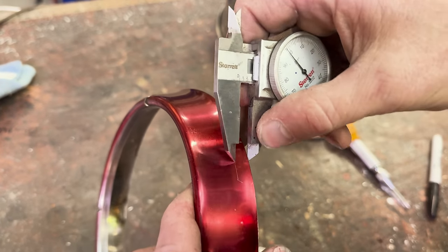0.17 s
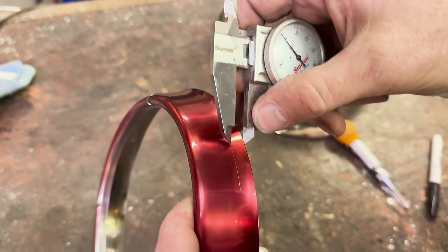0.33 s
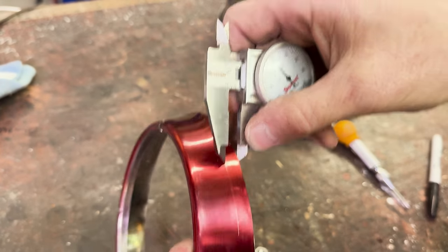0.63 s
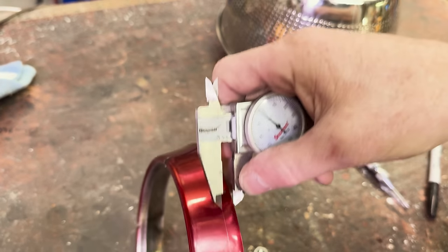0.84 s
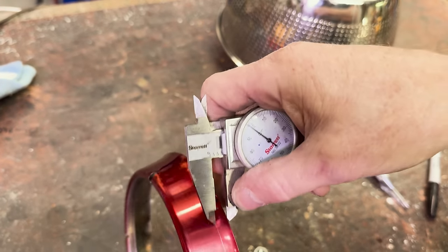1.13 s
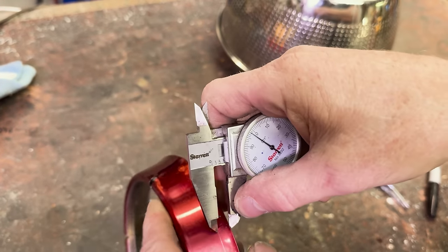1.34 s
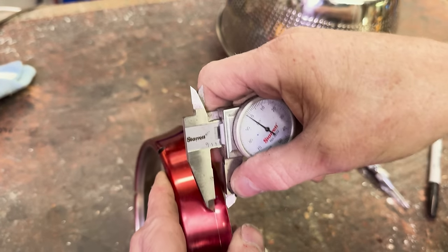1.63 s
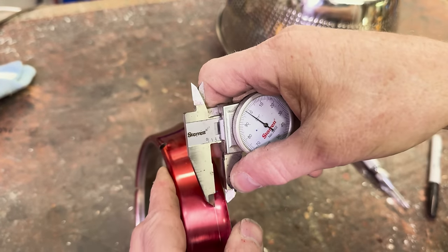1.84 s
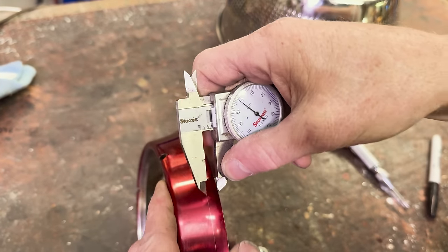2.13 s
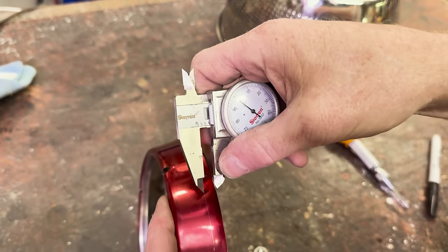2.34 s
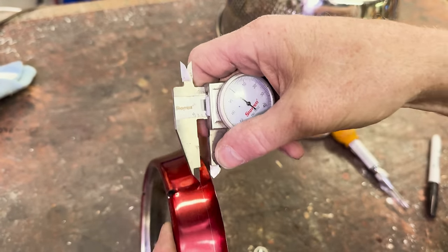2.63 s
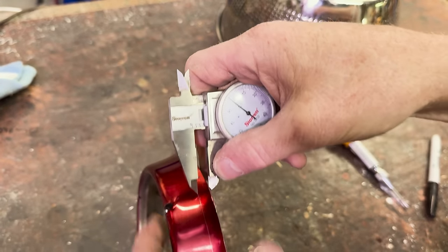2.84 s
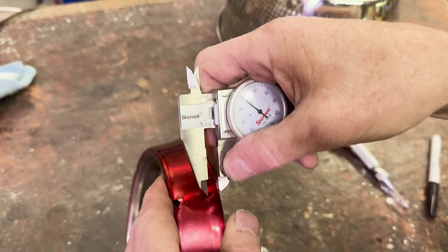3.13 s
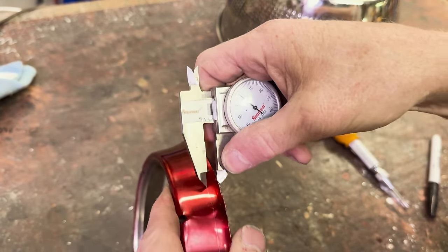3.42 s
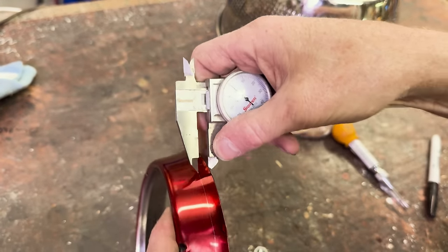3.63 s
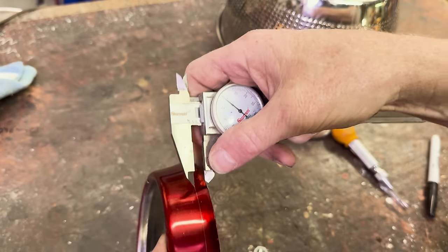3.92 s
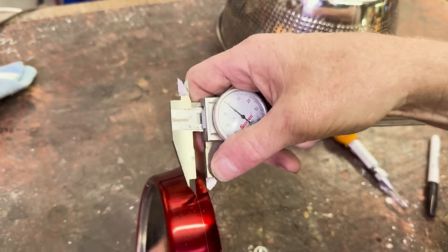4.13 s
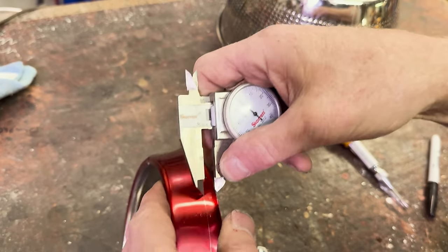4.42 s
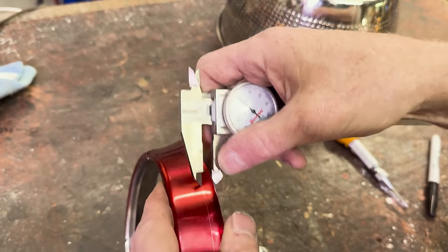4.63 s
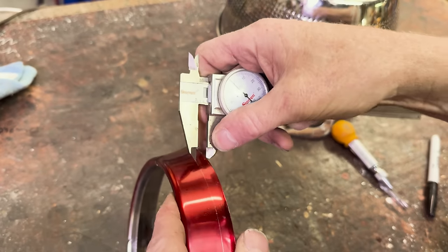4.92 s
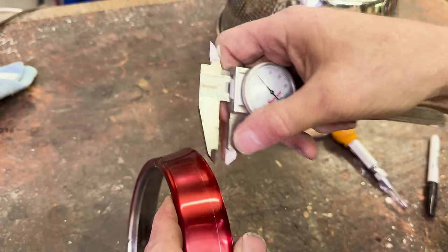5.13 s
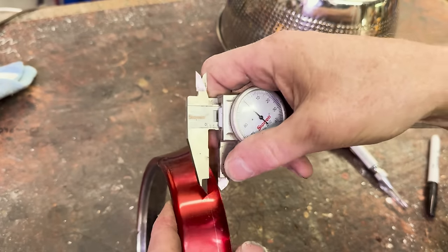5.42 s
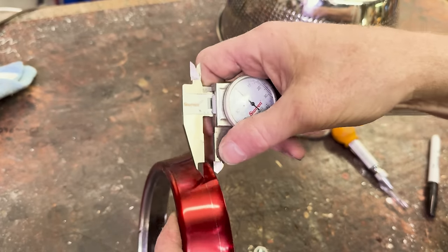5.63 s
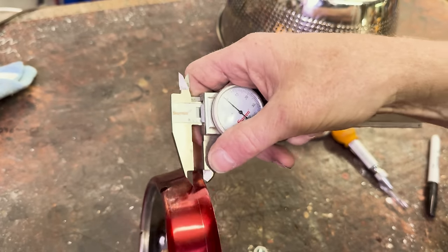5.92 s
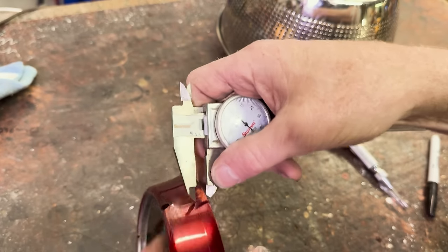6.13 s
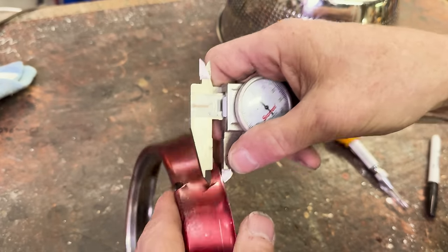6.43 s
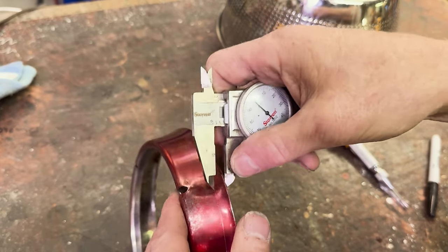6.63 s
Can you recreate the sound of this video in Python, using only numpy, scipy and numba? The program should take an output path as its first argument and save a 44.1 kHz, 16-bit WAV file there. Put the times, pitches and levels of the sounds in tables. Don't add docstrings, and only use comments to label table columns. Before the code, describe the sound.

Short uneven scratches of steel on steel, raspy and ringing in the mids with a thin bright hiss on top. They come in clusters separated by light skims, dull drags, small ticks and soft skin brushes as the ring is turned. Occasional hard clinks stand out, strongest in the later half. Close phone microphone, small dry workshop echo, distant low machine drone and quiet air underneath.

```python
import sys
import numpy as np
from scipy import signal
from scipy.io import wavfile
from scipy.ndimage import uniform_filter1d
from numba import njit

SR = 44100
rng = np.random.default_rng(int(sys.argv[2]) if len(sys.argv) > 2 else 0)


def how_loud(loudness_db):
    steps = np.asarray(loudness_db, float) / 20
    return 10 ** steps


def master(y):
    cut = np.clip(np.atleast_2d(y).T, -1, 1)
    pcm = np.round(cut * 32767)
    wavfile.write(sys.argv[1], SR, pcm.astype(np.int16))


N = 298557

# pitch_hz, width_hz, level_db
WALL_MODES = [(330, 170, -11.5), (520, 50, -8), (856, 130, -0.5), (1037, 206, -1), (1320, 28, -6.5),
              (1810, 240, -2.5), (2527, 190, -5.5), (1280, 5400, -17)]
# pitch_hz, width_hz, level_db
RIM_MODES = [(3024, 1400, -4.5), (3650, 67, -2), (4116, 170, 2), (4466, 160, 0), (4710, 100, -7.5),
             (4860, 440, -12), (5620, 89, -8.5), (6300, 200, -6.5), (4300, 6600, -11.5)]
# pitch_hz, width_hz, level_db
JAW_MODES = [(7100, 52, -3), (7332, 28, 3), (7550, 230, -6), (7816, 150, -1.5), (8075, 48, -3),
             (8550, 320, -5), (9270, 140, -2.5), (9600, 120, -13.5), (10300, 190, -11.5),
             (10180, 260, -8.5), (9100, 4800, -11.5)]
# pitch_hz, width_hz, level_db
EDGE_MODES = [(10950, 99, 2), (11440, 270, 1.5), (12170, 340, 4.5), (12080, 250, -16.5), (13700, 360, -2),
              (14300, 160, -5.5), (14840, 300, -7.5), (12400, 4300, -15.5)]
# pitch_hz, density_db (per Hz)
SHOP_SPECTRUM = [(24, -33), (40, -3.5), (131, -2), (336, -39), (450, -21), (484, -31), (520, -23),
                 (1050, -23), (1510, -23), (2020, -28.5), (5710, -41.5), (13000, -76.5)]
# start_s, peak_db, pitch_hz
GRIP_BUMPS = [(0.004, -49, 99), (0.898, -55, 219), (0.936, -47, 169), (1.038, -50, 175),
              (3.924, -51.5, 210), (4.61, -50, 176), (4.629, -48, 97), (5.374, -54.5, 280),
              (5.386, -46.5, 122), (5.8, -51, 120), (6.646, -55.5, 201)]
# start_s, length_s, first_force_db, last_force_db, wall_bite_db
STROKES = [(0.0, 0.0094, -44.5, -63.5, 1), (.05, .008, -60, -70, -1), (0.096, 0.03, -45, -37.5, 2),
           (0.234, 0.08, -33.5, -36.5, 0), (0.342, 0.067, -34, -33, -1), (0.421, 0.051, -43, -51.5, 4),
           (0.522, 0.029, -42.5, -40, 3.5), (1.944, 0.047, -48, -43.5, 11.5), (2.005, 0.06, -47, -47, 2),
           (2.088, 0.049, -43, -50.5, 5), (2.154, 0.12, -52, -51, 4.5), (2.292, 0.096, -50.5, -46.5, 3),
           (2.397, 0.1, -55, -61.5, 6), (2.509, 0.063, -32.5, -37.5, -6.5), (3.31, 0.054, -41, -31.5, 1),
           (3.465, 0.12, -50.5, -26.5, 4.5), (3.602, 0.036, -22.5, -36.5, 0), (3.887, 0.03, -52.5, -34, -3),
           (4.632, 0.072, -36, -29.5, -4), (4.725, 0.085, -30.5, -41, -1.5),
           (4.944, .03, -55.5, -55.5, 4.5), (5.512, 0.06, -30.5, -29, 1.5), (5.759, 0.087, -33, -40, 1),
           (5.86, 0.054, -49, -52.5, 0)]
# start_s, length_s, first_force_db, last_force_db
SKIMS = [(.8, 0.096, -68, -78), (1.06, 0.11, -58.5, -59.5), (1.24, .05, -59, -53.5), (1.3, 0.11, -59, -66),
         (1.478, 0.023, -59, -52), (2.705, 0.058, -63.5, -50.5), (2.775, 0.037, -61, -61.5),
         (2.907, 0.043, -53.5, -47), (3.26, 0.038, -64, -49), (3.82, 0.04, -53.5, -61),
         (4.048, 0.052, -50, -57.5), (4.115, .015, -53.5, -56), (4.18, 0.018, -54, -59),
         (4.243, 0.035, -47, -41.5), (4.3, 0.048, -61, -59), (4.49, 0.032, -67, -76),
         (6.028, 0.011, -48.5, -52.5), (6.07, 0.023, -61, -56), (6.138, 0.03, -44, -45),
         (6.2, 0.05, -50.5, -49.5), (1.38, 0.074, -66, -76), (6.26, 0.055, -61.5, -62.5),
         (6.38, 0.065, -76, -69), (6.54, 0.0075, -60, -55), (6.655, 0.031, -65, -69.5),
         (6.745, 0.011, -66, -67)]
# start_s, length_s, first_force_db, last_force_db
DRAGS = [(.59, 0.19, -58, -71.5), (.91, .08, -64, -79), (1.525, 0.068, -55, -71), (2.62, 0.049, -67, -74),
         (2.99, 0.096, -57, -66.5), (3.405, 0.03, -64, -50), (3.66, 0.15, -50.5, -66),
         (3.95, 0.054, -64, -62), (4.385, 0.051, -53, -71), (4.62, 0.018, -42, -39),
         (4.87, 0.091, -56.5, -55.5), (4.99, .08, -68, -77), (5.39, 0.087, -52, -48),
         (5.6, 0.068, -59, -56.5), (5.95, 0.058, -59, -68.5)]
# at_s, tip_hz, tip_db, freedom_db
GRIP = [(0.0, 2130, 2, 6), (.42, 2147, 3, 2.5), (.54, 2190, -3, -2), (.9, 1870, -31, -3.5),
        (1.5, 1810, -6, -11), (1.98, 2330, -11.5, -3), (2.43, 2300, -13.5, -5.5), (2.54, 2200, 1.5, 0.5),
        (3.3, 1920, -15.5, -1.5), (3.6, 1890, -3, -2), (3.92, 2150, 4, -1.5), (4.3, 1970, -5, -10),
        (4.64, 2170, -4.5, -1.5), (4.8, 1960, -11.5, 0.5), (5.35, 2180, -5, -1.5), (5.55, 2070, -5, -3),
        (5.8, 2016, -3.5, 1.5), (6.77, 1990, -5, -2.5)]
# start_s, wall_db, rim_db, jaw_db, spot_pitch_hz
KNOCKS = [(.074, -27.5, -39, -37, 2100), (.088, -24.5, -33, -28, 2170), (.112, -32.5, -39, -29.5, 2100),
          (.44, -21.5, -35, -40, 2190), (.486, -25, -37, -44, 2190), (.896, -31.5, -49, -42.5, 1650),
          (1.51, -29, -27, -31.5, 1700), (2.974, -31, -21.5, -29, 1690), (3.475, -22, -39, -34, 1810),
          (3.641, -18.5, -30, -31, 1930), (3.848, -33, -42, -44.5, 2050), (3.888, -41, -32, -35, 2200),
          (3.919, -13, -29, -30.5, 2070), (4.286, -23.5, -31, -44, 2670), (4.365, -31, -34, -37.5, 1800),
          (4.371, -33, -44, -38, 2520), (4.608, -8, -10.5, -14.5, 2470), (5.347, -11, -15, -18, 2510),
          (5.374, -11, -9, -11, 2460), (5.681, -49, -37, -49, 2200), (5.699, -37.5, -44, -42.5, 1990),
          (5.743, -19.5, -41, -35, 1940)]
# start_s, wall_db, jaw_db, spot_pitch_hz
TICKS = [(.46, -32, -40, 2140), (0.933, -41.5, -59, 1780), (1.706, -49, -72, 1250),
         (1.889, -42.5, -73, 1870), (1.912, -40, -55, 1780), (2.902, -66, -52, 1710),
         (3.257, -47.5, -44.5, 2340), (3.284, -37.5, -50, 2780), (3.788, -55, -54, 1560),
         (3.823, -36, -54, 2050), (4.242, -59, -42, 1310), (4.968, -36.5, -48, 2100),
         (6.135, -56, -36.5, 2290), (6.38, -70, -70, 1345), (6.537, -53.5, -45.5, 2840),
         (6.642, -39, -61.5, 1595)]
# start_s, length_s, first_level_db, last_level_db
BRUSHES = [(.6, 0.1, -81, -81), (.915, 0.097, -59, -70.5), (1.05, 0.29, -73, -66.5),
           (1.41, 0.067, -57.5, -53.5), (1.53, 0.073, -53.5, -64), (2.6, 0.24, -53, -79),
           (2.99, 0.16, -57, -77), (4.0, 0.38, -71, -69), (5.0, 0.092, -58.5, -75), (5.2, 0.16, -68, -62.5),
           (6.1, 0.19, -64.5, -65), (6.36, 0.34, -73.5, -71.5)]

SHOP_AIR_DB, SHOP_RUMBLE_DB = -68.5, -56
ROOM_T60_S, ROOM_DB = 0.2, -12.5
STROKE_RISE_DB_S, STROKE_FALL_DB_S = 593.5, 427
SKIM_RISE_DB_S, SKIM_FALL_DB_S = 1100, 437
DRAG_RISE_DB_S = 2003
STROKE_RIM_DB, RIM_SHARE_OF_BITE = -4, 0.18
STROKE_EDGE_DB, EDGE_SHARE_OF_BITE = -7.5, -0.24
SKIM_WALL_DB, SKIM_RIM_DB, SKIM_EDGE_DB = -20.5, -18, -9
DRAG_WALL_DB, DRAG_RIM_DB, DRAG_EDGE_DB = -5.5, -5, -13.5
TIP_WIDTH_HZ, TIP_DB = 290.0, 7
HELD_BELOW_HZ = 1200
CLINK_WIDTH_HZ, CLINK_DB = 280.0, 5.5
CHINK_HZ, CHINK_AT_HZ, CHINK_SLOPE = 3606, 2494, 1.3
TICK_RIM_DB = -15.5
BRUSH_FADE_DB_S, BRUSH_LOW_HZ, BRUSH_HIGH_HZ = 246, 913, 6500


@njit
def moving_band(x, hz, width):
    y, b, l = np.empty(len(x)), 0., 0.
    for i in range(len(x)):
        g, k = np.tan(np.pi * hz[i] / SR), width / hz[i]
        v = (b + g * (x[i] - l)) / (1 + g * (g + k))
        b, l, y[i] = 2 * v - b, l + 2 * g * v, k * v
    return y


def mode(x, hz, width):
    return signal.lfilter(*signal.iirpeak(hz, hz / width, SR), x)


def band(x, low_hz, high_hz):
    return signal.sosfilt(signal.butter(2, [low_hz, high_hz], "band", fs=SR, output="sos"), x)


def walk(rate):
    hold = int(SR / rate)
    steps = np.repeat(rng.standard_normal(N // hold + 1), hold)
    return 1.15 * uniform_filter1d(uniform_filter1d(steps, hold), hold)[:N]


def workshop():
    rumble, air = 0, 0
    hz_at, db_at = np.transpose(SHOP_SPECTRUM)
    for hz in 48 * 2 ** np.arange(0, 8.1, .5):
        db = np.interp(np.log(hz), np.log(hz_at), db_at) + 0.47 * walk(5.9)
        noise = mode(mode(rng.standard_normal(N), hz, hz / 2), hz, hz / 2)
        part = how_loud(db) * noise * np.sqrt(.5)
        if hz < 230:
            rumble = rumble + part
        else:
            air = air + part
    machine = 8 * mode(rng.standard_normal(N), 95, 18)
    rumble = rumble + how_loud(8.5) * np.std(rumble) * machine
    return rumble / np.std(rumble) * how_loud(SHOP_RUMBLE_DB) + air / np.std(air) * how_loud(SHOP_AIR_DB)


def force_power(rows, gain_db, rise_db_s, fall_db_s):
    t, power = np.arange(N) / SR, np.zeros(N)
    for (s, length, first, last, *_), db in zip(rows, np.broadcast_to(gain_db, len(rows))):
        near = slice(max(int((s - .15) * SR), 0), int((s + length + .25) * SR))
        late = t[near] - s
        held = first + (last - first) * np.clip(late / length, 0, 1)
        rise = rise_db_s * np.maximum(-late, 0)
        fall = fall_db_s * np.maximum(late - length, 0)
        power[near] += how_loud(db + held - rise - fall) ** 2
    return power


def contact(stroke_db, skim_db, drag_db):
    strokes = force_power(STROKES, stroke_db, STROKE_RISE_DB_S, STROKE_FALL_DB_S)
    skims = force_power(SKIMS, skim_db, SKIM_RISE_DB_S, SKIM_FALL_DB_S)
    drags = force_power(DRAGS, drag_db, DRAG_RISE_DB_S, STROKE_FALL_DB_S)
    return np.sqrt(strokes + skims + drags)


def grit(spike_db, catch_db):
    slips = rng.standard_normal(N) * how_loud(spike_db * np.minimum(rng.exponential(size=N), 6))
    slips = slips * how_loud(catch_db * walk(170) + .6 * catch_db * walk(45))
    return slips / np.std(slips)


def steel(modes, rub, blow, last):
    out, power = 0, 0
    for hz, width, db in modes:
        reach = how_loud(2.4 * rng.standard_normal(len(KNOCKS + TICKS)))
        feed = rub * how_loud(3.1 * walk(8)) + blow * reach[last]
        feed = feed * rng.choice([-1, 1], size=N)
        out = out + how_loud(db) * mode(feed, hz, width)
        power += how_loud(db) ** 2 * width
    return out / np.sqrt(power * np.pi / 2 / SR)


def caliper_on_ring():
    bite = np.transpose(STROKES)[4]
    on_wall = contact(bite, SKIM_WALL_DB, DRAG_WALL_DB)
    on_rim = contact(STROKE_RIM_DB + RIM_SHARE_OF_BITE * bite, SKIM_RIM_DB, DRAG_RIM_DB)
    on_jaw = contact(0, 0, 0)
    on_edge = contact(STROKE_EDGE_DB + EDGE_SHARE_OF_BITE * bite, SKIM_EDGE_DB, DRAG_EDGE_DB)

    at_s, *grip_columns = np.transpose(GRIP)
    tip_hz, tip_db, free_db = [np.interp(np.arange(N) / SR, at_s, c) for c in grip_columns]
    blow, last = taps()
    _, wall_tap, rim_tap, jaw_tap, spot_hz = np.transpose(all_taps())[:, last]

    dig = grit(spike_db=2.5, catch_db=2.7)
    slide = grit(spike_db=2.5, catch_db=2.8)
    both = (dig + slide) / np.sqrt(2)

    held_modes = [m for m in WALL_MODES if m[0] < HELD_BELOW_HZ]
    free_modes = [m for m in WALL_MODES if m[0] >= HELD_BELOW_HZ]
    held = steel(held_modes, dig * on_wall * how_loud(-5.5), blow * how_loud(wall_tap - 11.0), last)
    free = steel(free_modes, dig * on_wall * how_loud(-6.5), blow * how_loud(wall_tap - 8.5), last)
    wall = how_loud(free_db - 4.5) * held + how_loud(-2.1) * free
    rim = steel(RIM_MODES, dig * on_rim * how_loud(-2.0), blow * how_loud(rim_tap - 11.5), last)
    jaw = steel(JAW_MODES, both * on_jaw * how_loud(-3.5), blow * how_loud(jaw_tap + 2.0), last)
    edge = steel(EDGE_MODES, both * on_edge * how_loud(-3.0), blow * how_loud(jaw_tap - 5.5), last)

    tip = dig * on_wall * how_loud(tip_db + TIP_DB + 12.5)
    for _ in range(2):
        tip = moving_band(tip, tip_hz, TIP_WIDTH_HZ)
    struck = struck_spot(blow, wall_tap, rim_tap, spot_hz)
    wall, rim = band(wall, 370, 3700), band(rim, 2400, 8500)
    jaw, edge = band(jaw, 5100, 12000), band(edge, 10000, 15600)
    return wall + rim + jaw + edge + tip + struck


def room(x):
    t = np.arange(SR // 2) / SR
    decay = np.exp(-np.log(1000) * t / ROOM_T60_S)
    tail = rng.standard_normal(len(t)) * decay * np.minimum(t / 0.0017, 1)
    return signal.fftconvolve(x, tail / np.linalg.norm(tail))[:N] * how_loud(ROOM_DB)


def grip_shifts():
    out, t = np.zeros(N + 4000), np.arange(4000) / SR
    shape = np.exp(-t / 0.021) * np.minimum(t / 0.0018, 1)
    for s, db, hz in GRIP_BUMPS:
        i = int(s * SR)
        out[i:i + len(t)] += how_loud(db + 6.5) * np.sin(2 * np.pi * hz * t) * shape
    return out[:N]


def all_taps():
    ticks = [(s, wall, (wall + jaw) / 2 + TICK_RIM_DB, jaw, hz) for s, wall, jaw, hz in TICKS]
    return sorted(KNOCKS + ticks)


def taps():
    blow, last = np.zeros(N), np.zeros(N, int)
    t = np.arange(1500) / SR
    shape = np.exp(-t / 0.0045) * np.minimum(t / 0.00065, 1)
    for k, (s, *_) in enumerate(all_taps()):
        rattle = rng.standard_normal(len(t)) * shape
        i = int(s * SR)
        blow[i:i + len(t)] += rattle / np.linalg.norm(rattle) * 7.06
        last[i:] = k
    return blow, last


def struck_spot(blow, wall_tap, rim_tap, spot_hz):
    clink = moving_band(blow * how_loud(wall_tap + CLINK_DB + 5.5), spot_hz, CLINK_WIDTH_HZ)
    chink_hz = np.minimum(CHINK_HZ * (CHINK_AT_HZ / spot_hz) ** CHINK_SLOPE, 6300)
    chink = moving_band(blow * how_loud(rim_tap + 15.5), chink_hz, 340.)
    return band(clink, 370, 3700) + chink


def fingers():
    swish = band(rng.standard_normal(N), BRUSH_LOW_HZ, BRUSH_HIGH_HZ)
    swish = band(swish, 300, BRUSH_HIGH_HZ) * how_loud(1.5 * walk(30))
    pressure = np.sqrt(force_power(BRUSHES, 0, BRUSH_FADE_DB_S, BRUSH_FADE_DB_S))
    return swish / np.std(swish) * pressure


def scene():
    near = caliper_on_ring()
    return (near + room(near) + grip_shifts() + workshop() + fingers())[None]


def band_limit(x):
    return signal.sosfilt(signal.butter(12, 16520, fs=SR, output="sos"), x)


def record(dry):
    dry = signal.sosfilt(signal.butter(4, 53, "high", fs=SR, output="sos"), dry)
    dry = .9 * np.tanh(dry / .9)
    dry = signal.sosfilt(signal.ellip(8, .2, 60, 15700, fs=SR, output="sos"), dry)
    return band_limit(dry)


dry = scene()
out = record(dry)
master(out)
```